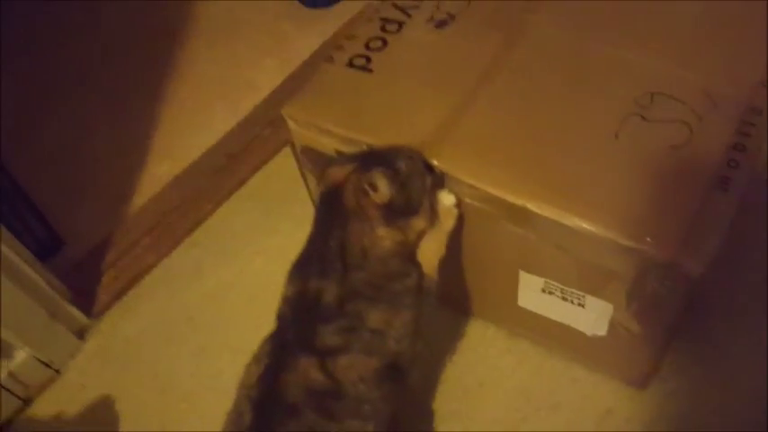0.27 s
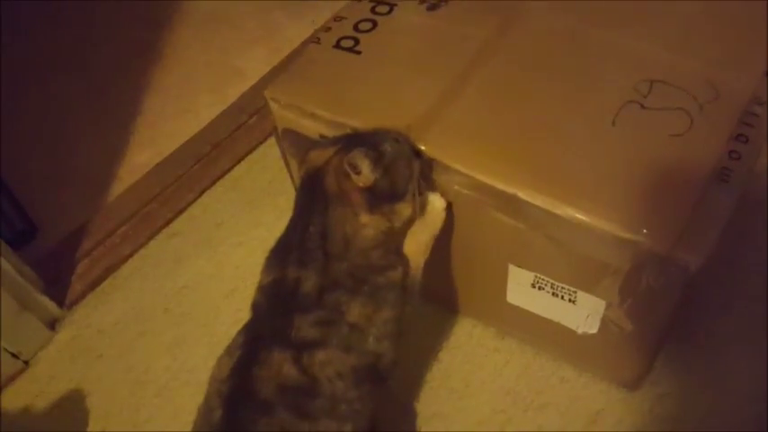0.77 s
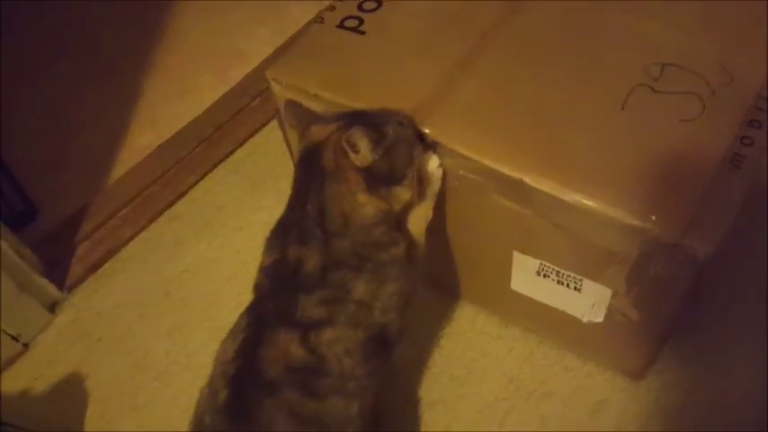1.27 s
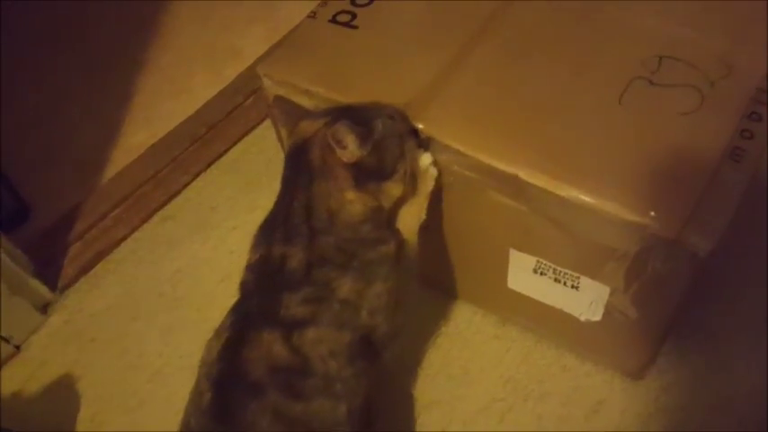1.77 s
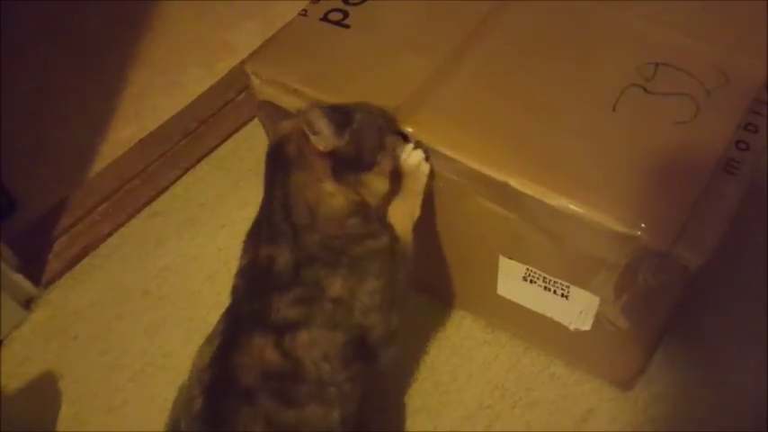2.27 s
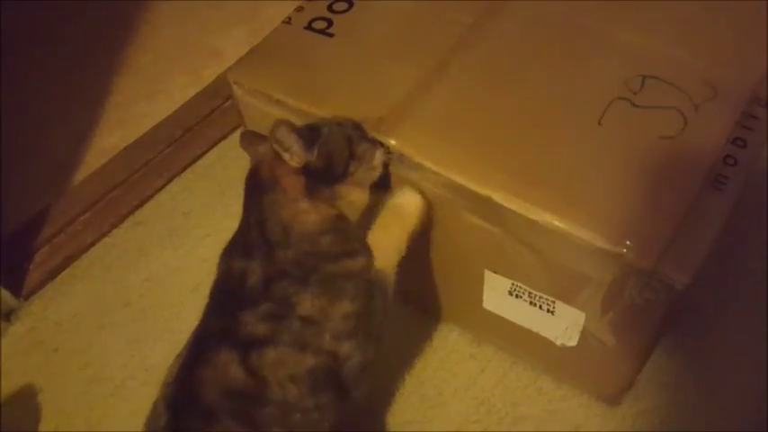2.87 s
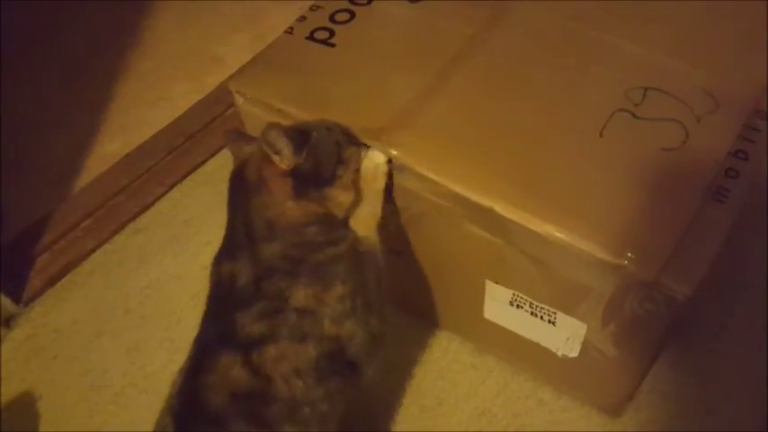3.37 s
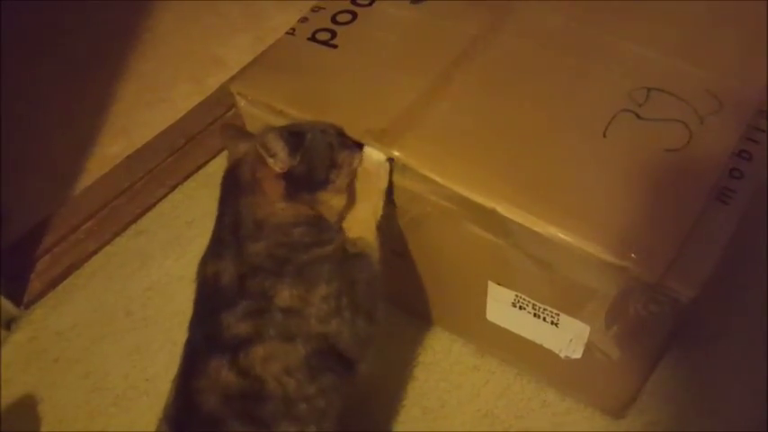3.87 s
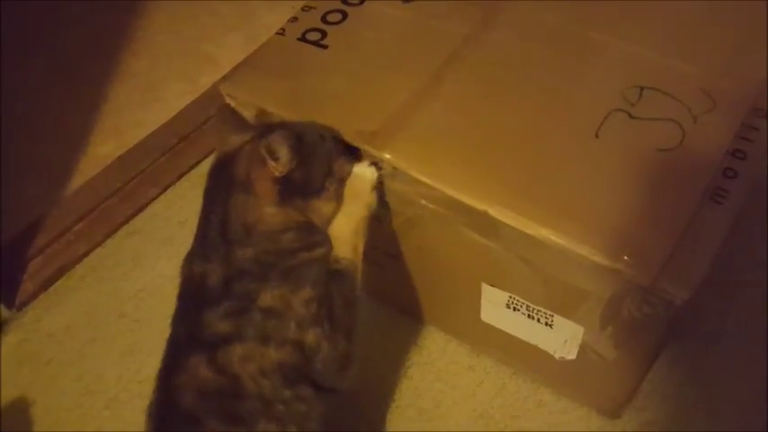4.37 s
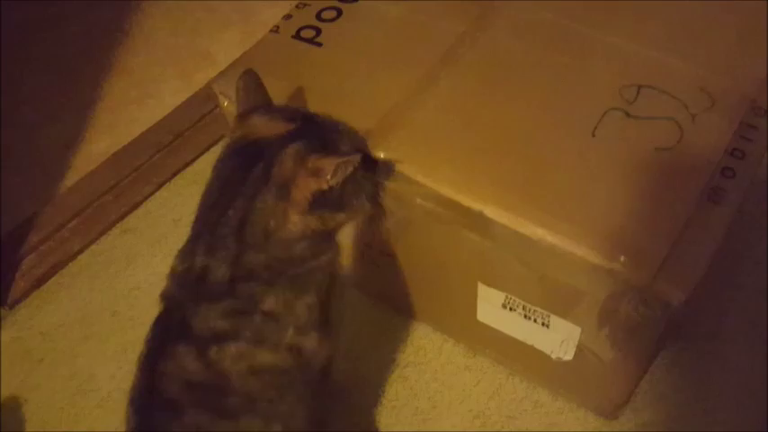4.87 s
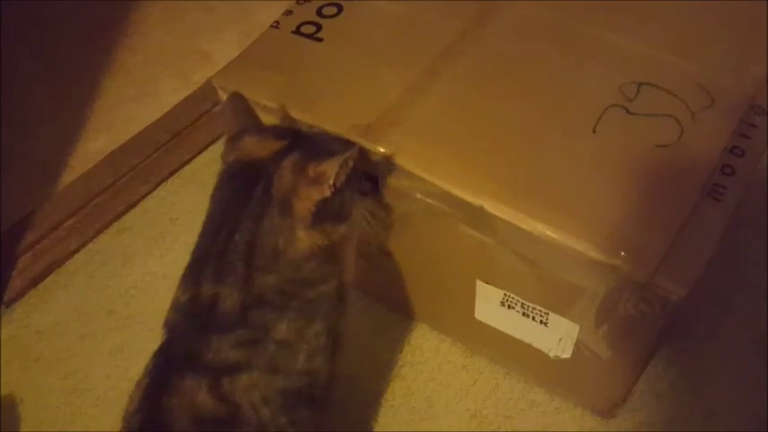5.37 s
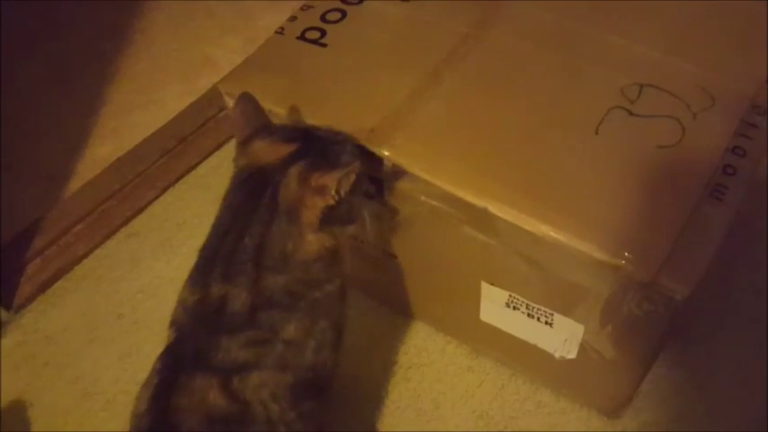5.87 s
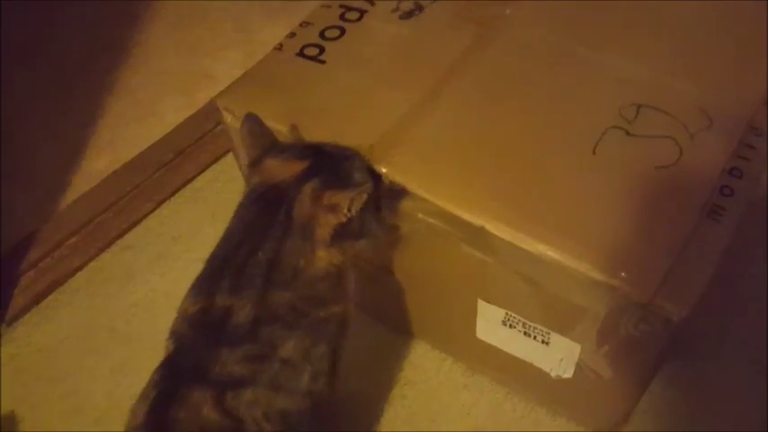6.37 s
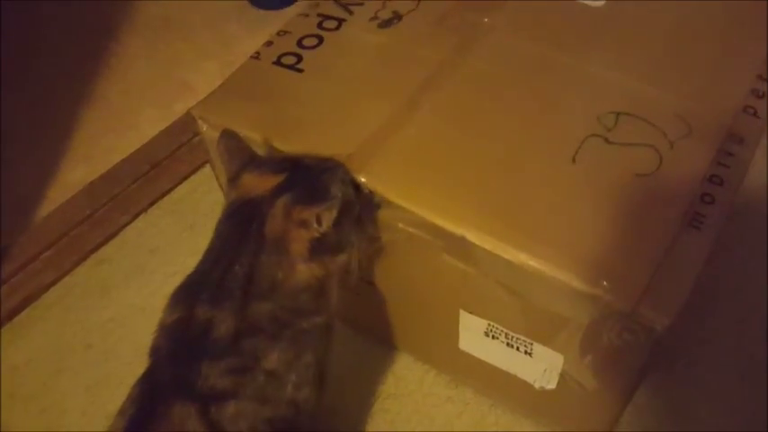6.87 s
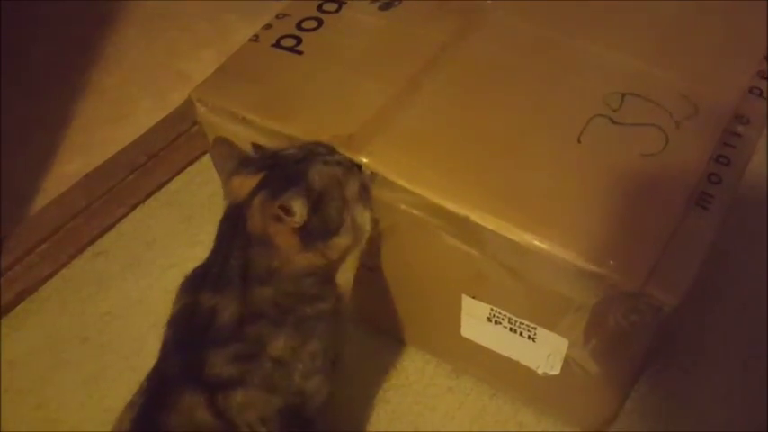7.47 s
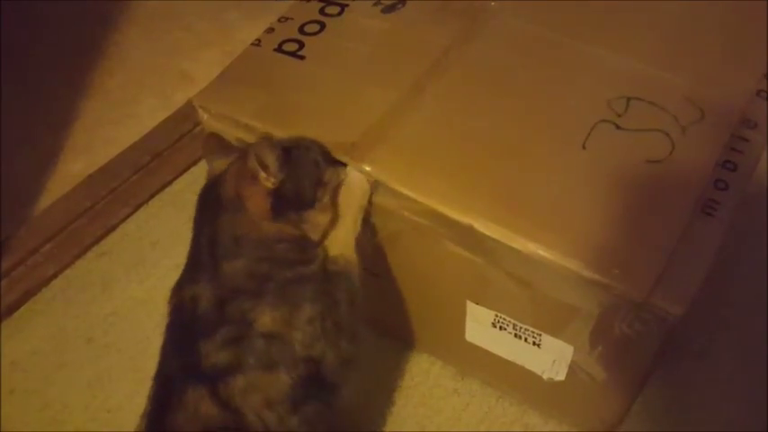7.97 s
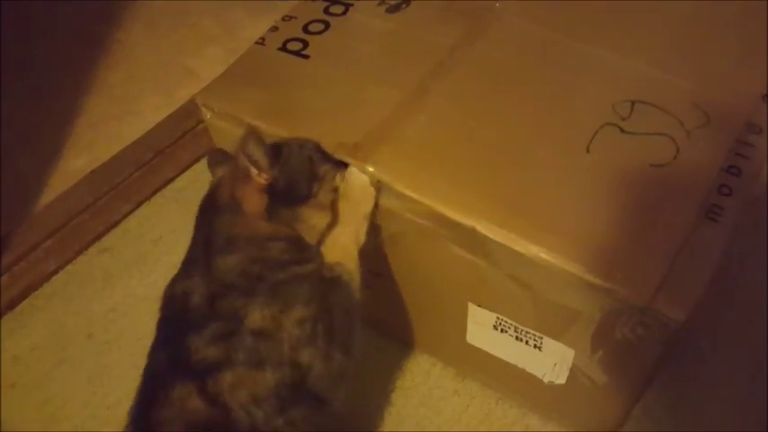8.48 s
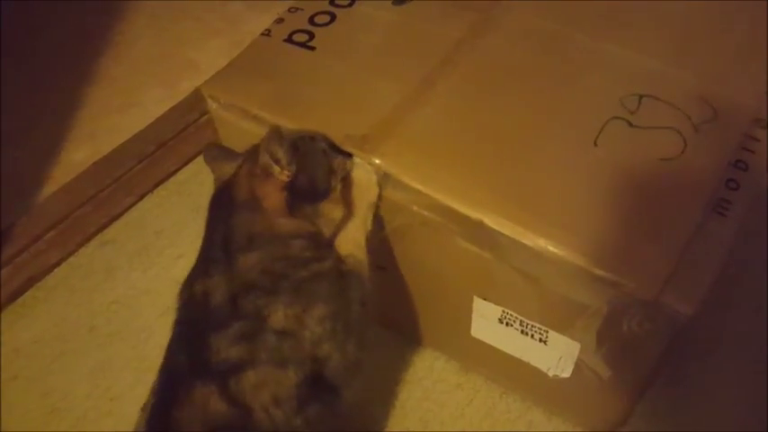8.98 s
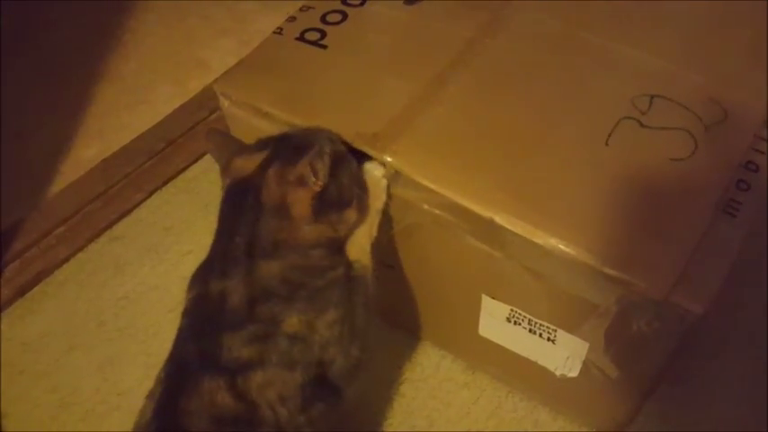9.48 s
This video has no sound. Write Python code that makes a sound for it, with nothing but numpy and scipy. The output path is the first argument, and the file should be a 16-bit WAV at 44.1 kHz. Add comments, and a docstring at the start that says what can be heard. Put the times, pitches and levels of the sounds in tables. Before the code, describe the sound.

Close up in a quiet room, a cat picks at the taped edge of a cardboard box. Sparse pops come first, then a loud sharp crack, a dense run of snaps, gritty scratches and tape ticks, and a louder hollow crack. After a lull, clawing resumes more lightly. A hand-held microphone adds soft handling bumps, low hum and faint hiss.

```python
"""Cat clawing a taped box

A cat claws and bites at the taped edge of a cardboard box in a quiet room, close to a hand-held camera.
Snaps, grit and small bright ticks are shaped noise and impulses; panels and enclosed air resonate.
Paw thuds and fingers nudging the camera are short sine swells; decaying noise makes the room's answer.
Underneath, filtered noise gives a wavering low hum and rumble, microphone noise and a faint hiss,
thickening where the clawing is dense."""
import sys
import numpy as np
from scipy import signal
from scipy.fft import rfft, irfft, next_fast_len
from scipy.io import wavfile
from scipy.ndimage import map_coordinates

SR = 44100
rng = np.random.default_rng(int(sys.argv[2]) if len(sys.argv) > 2 else 0)


def store_pcm(level_fs):
    """Save levels as 16-bit WAV."""
    pcm = np.round(np.clip(level_fs, -1, 1) * 32767).astype(np.int16)
    wavfile.write(sys.argv[1], SR, np.atleast_2d(pcm).T)


N = 429534  # length in samples

# Hum and room rumble, spectral shape: pitch_hz, relative_db (per Hz)
RUMBLE_SPECTRUM = [(18, -30.5), (28, 5), (45, -4), (75, -4.5), (102, 1.5), (140, -6.5), (165, -11.5),
                   (194, -6.5), (257, -12.5), (383, -10.5), (613, -12.5), (640, -14), (900, -24.5),
                   (1170, -49.5), (1980, -120)]
# Rumble, left-right correlation: pitch_hz, likeness (1 = identical)
RUMBLE_LIKENESS = [(60, 0.91), (300, 0.42), (700, 0.11)]
# Rumble fader, before its wavering: time_s, level_db
RUMBLE_FADER = [(0.0, -67), (0.65, -63.5), (5.18, -61.5), (5.6, -64), (8.4, -62), (9.74, -63.5)]
# Faint hiss, spectral shape: pitch_hz, relative_db (per Hz)
HISS_SPECTRUM = [(590, -22.5), (1000, -10.5), (1680, -17), (1930, -28), (2270, -13), (3240, -10.5),
                 (4810, -18.5), (5900, -18.5), (6630, -12.5), (7500, -18.5), (8800, -21.5), (9700, -36),
                 (22000, -120)]
# Hiss fader, before wavering and stereo balance: time_s, level_db
HISS_FADER = [(0, -104), (.2, -70), (.8, -69.5), (2.7, -68.5), (3.4, -70.5), (4.2, -65), (5.8, -84),
              (7.2, -84), (8.7, -71.5), (9.74, -79.5)]
# Microphone noise, spectral shape: pitch_hz, relative_db (per Hz)
MIC_NOISE_SPECTRUM = [(410, -47.5), (700, -6), (1700, -9.5), (2510, -11), (3480, -14), (8900, -21),
                      (15800, -19.5)]

# Room decay: pitch_hz, t60_s (time to fall 60 dB)
ROOM_DECAY = [(100, 0.42), (400, 0.41), (1200, 0.4), (3000, 0.42), (6000, 0.31), (10000, 0.25),
              (16000, 0.22)]
# Echoes, left-right correlation: pitch_hz, likeness (1 = identical)
ECHO_LIKENESS = [(100, 0.9), (350, 0.9), (700, 0.3), (1200, 0.097)]
ECHO_DULL_HZ = 7000  # the sharpest treble beams at the camera; the walls get less
SPARSE_DB, SPARSE_S = 6.5, 0.049  # uneven early arrivals: their scatter, and how soon they merge
# The near wall answers as a dull clump: delay, spread, boost, treble corner
WALL_S, WALL_SPREAD_S, WALL_GAIN, WALL_DULL_HZ = 0.013, 0.0051, 0.94, 2500

# Fingers shifting on the camera by its right port: start_s, level_db, pitch_hz (nominal, before the sag)
BUMPS = [(0.9302, -35.5, 207), (1.026, -42, 200), (1.136, -45, 150), (1.247, -43, 140), (1.5505, -34, 128),
         (1.73, -41, 112), (6.29, -38, 246), (6.357, -40, 149.6), (6.422, -43.5, 224), (6.487, -41.5, 200)]
# Attack; power of the cycle count (under 1: pitch falls); left port against right
BUMP_RISE_CYCLES, BUMP_SAG, BUMP_LEFT_DB = 0.24, 0.68, -33

# Box panels as resonances: pitch_hz, width_hz, relative_db
PANELS = [(291.7, 160, -5), (457.8, 350, -0.5), (730, 830, 0.5), (863, 300, -5), (1043.5, 290, -3.5),
          (1400, 410, -3.5)]
# Air inside the box as resonances: pitch_hz, width_hz, relative_db
CAVITY_MODES = [(108, 100, 3), (161, 8.3, 7.5), (198, 440, 2.5)]
# A paw thudding on the box: start_s, level_db, pitch_hz
KNOCKS = [(0.593, -40.5, 184), (0.773, -52.5, 174), (1.878, -53, 155), (3.046, -49, 300),
          (3.253, -46.5, 150), (3.432, -42.5, 230), (3.657, -45.5, 159.3), (4.958, -25, 232.9),
          (4.96, -34.5, 84.4), (8.237, -41, 148), (8.465, -34, 147.7), (8.467, -32, 353),
          (9.386, -49.5, 149)]
# Swell; contact tick against the thud; send to the walls
KNOCK_RISE_CYCLES, KNOCK_TICK_DB, KNOCK_ECHO_DB = 0.86, -4, -3

# Small bright ticks, the first two are handling, the rest mostly tape unsticking:
# start_s, level_db, pitch_hz
TICKS = [(0.069, -60, 5000), (0.125, -58, 9000), (0.613, -33, 4060), (0.621, -34.5, 4560),
         (1.298, -44, 5750), (1.882, -46, 6000), (1.899, -41, 6500), (1.9496, -45, 7000),
         (1.969, -44, 7460), (2.2318, -45, 7000), (3.611, -50, 4970), (3.761, -40, 4470),
         (4.035, -38.5, 4950), (4.108, -32, 5100), (4.114, -36, 3560), (4.189, -37, 6000),
         (4.197, -37, 4000), (4.328, -42, 5030), (4.506, -41, 2800), (4.793, -51, 5950),
         (4.9092, -47, 3000), (5.2102, -46, 4000), (5.4604, -47.5, 9000), (5.482, -44, 7000),
         (5.825, -43, 9000), (5.958, -49, 6000), (5.9882, -37.5, 11000), (6.905, -50, 8380),
         (7.451, -47.5, 6040), (8.399, -46.5, 2010), (8.607, -30.5, 6460), (8.616, -30, 4000),
         (8.7481, -44.5, 5500), (8.76, -51, 6000)]
# Decay time; sharpness of pitch; share of thin broad crackle; send to the walls
TICK_S, TICK_Q, TICK_PLAIN, TICK_ECHO_DB = 0.0014, 1.8, 0.11, -2.5

# Claws or pads dragging over the card:
# start_s, length_s, scratch_level_db, tape_over_scratch_db, rub_level_db, panel_pitch_hz
SCRAPES = [(0.863, 0.091, -65, -4.5, -91, 690), (1.863, 0.036, -60, 7, -64.5, 600),
           (2.083, 0.19, -68, -18, -79, 614), (3.812, 0.08, -65, -12, -62, 730),
           (3.938, 0.029, -60, 2.5, -63.5, 980), (4.094, 0.073, -57.5, -4, -67, 605),
           (4.175, 0.029, -50.5, -7, -53, 497), (4.578, 0.022, -48, -9, -60, 510),
           (5.181, 0.12, -65.5, -13, -67.5, 830), (5.275, 0.089, -61.5, 6.5, -68.5, 770),
           (5.694, 0.13, -72, -2, -72, 500), (6.176, 0.079, -60.5, 4.5, -64, 500),
           (7.585, 0.046, -60, -8, -66.5, 990), (7.807, 0.26, -76.5, 7.5, -85, 600),
           (8.162, 0.071, -64, -8, -56.5, 385), (8.215, 0.085, -62.5, -1, -62.5, 920),
           (8.335, 0.36, -69, 0.5, -68.5, 396), (8.577, 0.091, -48, -12, -54.5, 870),
           (8.728, 0.065, -63, -20, -66, 920), (8.848, 0.0474, -65.5, -4, -65.5, 1210),
           (9.28, 0.011, -62, -18, -63.5, 600), (9.39, 0.046, -53.5, -4, -58, 860)]
# Scratch on card, spectral shape: pitch_hz, relative_db (per Hz)
SCRATCH_SPECTRUM = [(500, -30.5), (1200, -2.5), (2500, -4), (4000, -8), (7000, -11), (15800, -41.5)]
# Tape fizz, spectral shape: pitch_hz, relative_db (per Hz)
TAPE_SPECTRUM = [(2500, -9.5), (5000, -4), (6500, -0.5), (9000, -2.5), (12500, -3.5), (15800, -9.5)]
CATCHES_PER_S, CATCH_DB = 150, 13  # average rate and boost of single catches in the grit

# A claw or tooth letting go:
# start_s, crack_level_db, box_over_crack_db, tape_over_crack_db, panel_pitch_hz, crack_pitch_hz
SNAPS = [(0.5934, -20.5, 3, 2.5, 757, 2650), (1.457, -26.5, -8, -2, 1400, 2140),
         (1.8782, -39.5, 3, -3, 600, 4520), (2.2845, -28.5, -1, -2.5, 1250, 3020),
         (2.4816, -29, -12.5, -9.5, 467, 2500), (2.733, -39, 2, -12.5, 487, 1585),
         (2.8333, -3.5, -2.5, -9, 600, 5707), (3.113, -40.5, -4.5, -14, 950, 1550),
         (3.2524, -36, 6.5, 1, 426, 1420), (3.285, -31, 1.5, 2.5, 450, 5640),
         (3.4336, -30.5, 5.5, -35, 536, 1670), (3.6559, -26, -1, -15, 715, 2200),
         (3.691, -28.5, -3.5, -12.5, 335, 2390), (3.7887, -25, -28, -8.5, 1170, 4460),
         (3.859, -29, -5, 3, 1040, 4530), (4.0671, -28, -13, -21, 404, 3210),
         (4.0956, -29, -18, -7.5, 945, 3940), (4.103, -25.5, -7, -2.5, 560, 3620),
         (4.1792, -29, -9, -3, 507, 2600), (4.2319, -17, -2, -10, 570, 2020),
         (4.382, -32.5, -14, 2.5, 939, 6260), (4.4785, -27.5, 3, -10, 460, 1080),
         (4.539, -35.5, -26, 0.5, 398, 2170), (4.588, -26.5, 0.5, -3.5, 280, 2970),
         (4.878, -49.5, 16.5, -0.5, 450, 1481), (4.9557, 3, -8, -8.5, 1160, 5770),
         (5.6633, -35.5, -29, 6, 548, 8300), (5.853, -38.5, 1, -25, 1290, 1870),
         (7.5776, -30.5, -16.5, -7, 1105, 1610), (7.637, -34, -12.5, 4.5, 1230, 1495),
         (8.4619, -46, 13, 12, 370, 1400), (8.4715, -35, 10, 10, 760, 1600),
         (8.58, -27.5, -7, -8.5, 1090, 6000), (8.5955, -20, -8.5, -7, 1100, 5330),
         (8.7313, -37.5, 5, -12, 1220, 1470), (8.9901, -43.5, 7.5, -3.5, 386, 2670),
         (9.343, -37, -3.5, -29, 455, 1455), (9.3869, -28, -5, -34, 1050, 1523)]
# Snap crack, spectral shape: pitch_hz, relative_db (per Hz)
CRACK_SPECTRUM = [(400, -17), (1000, -1), (1500, -6), (2200, -4.5), (3200, -3), (5000, -8.5), (6500, -9.5),
                  (9000, -15), (16000, -24.5)]
# A first give, the release, two rebounds: delay_s, level_db
JOLTS = [(0, -8.5), (.0015, 0.5), (.0032, -9.5), (.0049, -8)]
TEAR_S, SLIP_S = 0.00088, 0.0007  # decay of the fibre spray; delay until the claw slips off
ECHO_DB = 4.5  # impulse sent toward the walls
# Air in the box over the panels; small high panels pump less air
THUMP_DB, THUMP_DB_PER_OCTAVE, MID_PANEL_HZ = -4.5, -2, 600
CRACK_LOW = 0.35  # bass cut as a share of crack pitch, before the scaling that lowers it for hard pulls
CRACK_Q, CRACK_RING, CRACK_PLAIN = 8.8, 0.6, 0.86  # sharpness, ringing part, flat part
PANEL_Q, PANEL_RING, PANEL_PLAIN = 11, 1.8, 0.96  # same for the touched panel; hard pulls ring less

# Direct sound, stereo balance: pitch_hz, left_over_right_db
LEFT_OVER_RIGHT = [(300, -1), (1200, 4), (3000, -2), (5500, -12), (10000, 0.5)]
CEILING, TOP_HZ = 0.8, 15850  # camera's soft limit (full scale = 1) and band limit


def amp(db):
    """Turns decibels into gain."""
    return 10 ** (np.asarray(db) / 20)


def unit(x):
    """Scales to rms 1."""
    return x / np.sqrt(np.mean(x ** 2) + 1e-20)


def along(points, hz):
    """Reads (Hz, value) points along a log frequency axis."""
    f, v = np.transpose(points)
    return np.interp(np.log(hz + 1), np.log(f + 1), v)


def fader(points):
    """Draws straight moves between (s, dB) points, one value per sample."""
    s, db = np.transpose(points)
    return np.interp(np.arange(N) / SR, s, db)


def wobble(rate):
    """Draws a smooth random curve with this many knots a second."""
    knots = rng.standard_normal(int(N * rate / SR) + 4)
    return map_coordinates(knots, [np.arange(N) * rate / SR])


def filtered(x, response):
    """Multiplies the spectrum of x by a response of frequency, with room for the tail."""
    m = next_fast_len(N + SR // 2)
    return irfft(rfft(x, m) * response(np.fft.rfftfreq(m, 1 / SR)), m)[..., :N]


def causal(spectrum):
    """Minimum-phase response of unit energy: nothing sounds before the blow."""
    def response(hz):
        cepstrum = irfft(np.log(amp(along(spectrum, hz)) + 1e-6))
        half = len(cepstrum) // 2
        cepstrum[1:half] *= 2
        cepstrum[half + 1:] = 0
        log_response = rfft(cepstrum)
        return unit(np.abs(np.exp(log_response))) * np.exp(1j * log_response.imag)
    return response


def resonant(modes):
    """Sums damped resonances of alternating sign into a response of unit energy."""
    def response(f):
        total = 0
        for k, (center, width, db) in enumerate(modes):
            band = 1j * f * width
            total = total + (-1) ** k * amp(db) * band / (center * center - f * f + band)
        return total / np.sqrt(np.mean(np.abs(total) ** 2))
    return response


def panel(mode):
    """One panel takes up and gives off sound near its pitch, so its resonance acts twice."""
    def response(hz):
        once = resonant([mode])(hz)
        return once ** 2 / np.sqrt(np.mean(np.abs(once) ** 4))
    return response


def panels_db(hz, focus=9):
    """Panels tuned near the touched spot ring the most; focus = dB lost an octave away."""
    return np.array([level - focus * np.log2(center / hz) ** 2 for center, width, level in PANELS])


def pitched(x, hz, q, ring, plain):
    """Blends x with its own ringing at one pitch."""
    return plain * x + ring * signal.lfilter(*signal.iirpeak(hz, q, SR), x)


def alike_pair(z, alike):
    """Mixes two unrelated spectra (on axis -3) into left and right of the given likeness."""
    turn = np.arccos(np.clip(alike, -1, 1)) / 2
    mid, side = z[..., 0, :, :] * np.cos(turn), z[..., 1, :, :] * np.sin(turn)
    return np.stack([mid + side, mid - side], axis=-3)


def rush(spectrum, alike):
    """Filters steady noise into a stereo pair of rms 1 with the given left-right likeness."""
    def shape(hz):
        turn = np.arccos(np.clip(along(alike, hz), -1, 1)) / 2
        return amp(along(spectrum, hz)) * [np.cos(turn), np.sin(turn)]
    mid, side = filtered(rng.standard_normal((2, N)), shape)
    return unit(np.array([mid + side, mid - side]))


def background():
    """Wavering rumble, a faint hiss stronger on the right, and unrelated noise in each microphone."""
    rumble_db = fader(RUMBLE_FADER) + 0.5 * wobble(0.23) + 0.29 * wobble(11.0)
    rumble = amp(rumble_db) * rush(RUMBLE_SPECTRUM, RUMBLE_LIKENESS)
    hiss_db = fader(HISS_FADER) + 0.74 * wobble(1) + [[-2.1], [2.1]]
    hiss = amp(hiss_db) * rush(HISS_SPECTRUM, [(1000, 0.23)])
    mic_noise = amp(-69.0) * rush(MIC_NOISE_SPECTRUM, [(1000, 0)])
    return rumble + hiss + mic_noise


def room(x, count=4):
    """Each pitch dies at its own speed; random tails take turns by the clock, 1/8 s of sound each."""
    hz, t, z = signal.stft(rng.standard_normal((count, 2, SR * 3 // 4)), SR, nperseg=256)
    decay = amp(-60 * t / along(ROOM_DECAY, hz)[:, None])
    z = alike_pair(z, along(ECHO_LIKENESS, hz)[:, None]) * decay
    dulling = 1 + (hz[:, None] / WALL_DULL_HZ) ** 2
    z = z * (1 + WALL_GAIN / dulling * np.exp(-((t - WALL_S) / WALL_SPREAD_S) ** 2))
    tails = signal.istft(z, SR, nperseg=256)[1]
    age = np.arange(tails.shape[-1]) / SR
    tails *= amp(SPARSE_DB * np.exp(-age / SPARSE_S) * rng.standard_normal(tails.shape))
    tails *= 1 - np.exp(-age / 0.0051)  # the first walls take a few ms
    turn = np.arange(N) * 8 // SR % count
    echoes = np.zeros((2, N))
    for k, tail in enumerate(tails):
        tail = tail / np.linalg.norm(tail[0])
        echoes += signal.fftconvolve((x * (turn == k))[None], tail, axes=1)[:, :N]
    return echoes


def bumps():
    """A dry dent through the camera housing: quick start, sagging pitch, gone in about two cycles."""
    out, t = np.zeros(N + SR), np.arange(SR // 20) / SR
    for start_s, db, hz in BUMPS:
        u = t * hz / BUMP_RISE_CYCLES
        dent = np.sin(2 * np.pi * (hz * t) ** BUMP_SAG) * u * np.exp(1 - u)
        out[round(start_s * SR):][:len(t)] -= amp(db) * dent
    return out[:N] * amp([[BUMP_LEFT_DB], [0]])


def knocks():
    """A soft low push swells for most of a cycle and soon dies, with a faint panel tick at its height."""
    out, contacts, t = np.zeros(N + SR), np.zeros(N), np.arange(SR // 5) / SR
    for start_s, db, hz in KNOCKS:
        u = t * hz / KNOCK_RISE_CYCLES
        push = np.sin(2 * np.pi * hz * t) * (u * np.exp(1 - u)) ** 3
        out[round(start_s * SR):][:len(t)] += amp(db) * push
        contacts[round((start_s + KNOCK_RISE_CYCLES / hz) * SR)] = amp(db + KNOCK_TICK_DB)
    return out[:N] + filtered(contacts, resonant(PANELS))


def ticks():
    """Each tick is a short burst of decaying noise around its own pitch; scene() adds some echo."""
    out, t = np.zeros(N + SR), np.arange(SR // 50) / SR
    for start_s, db, hz in TICKS:
        spray = rng.standard_normal(len(t)) * np.exp(-t / TICK_S)
        burst = pitched(spray, hz, TICK_Q, 1, 0) + TICK_PLAIN * np.diff(spray, prepend=0)
        out[round(start_s * SR):][:len(t)] += amp(db) * burst / np.abs(burst).max()
    return out[:N]


def scrapes():
    """Clumped grit under strokes that swell and stop drives scratch, tape fizz and dull panel rub."""
    paths = [causal(SCRATCH_SPECTRUM), causal(TAPE_SPECTRUM)] + [panel(mode) for mode in PANELS]
    level = np.zeros((len(paths), N))
    for start_s, length_s, db, tape_db, rub_db, hz in SCRAPES:
        stroke = np.sin(np.pi * np.linspace(0, 1, round(length_s * SR))).clip(0) ** 0.5
        gains = amp([db, db + tape_db, *(rub_db + panels_db(hz))])
        level[:, round(start_s * SR):][:, :len(stroke)] += gains[:, None] * stroke
    catches = rng.random(N) < CATCHES_PER_S / SR
    scratch_or_tape = (np.arange(len(paths)) < 2)[:, None]  # the rub has no catches
    catches_db = CATCH_DB * catches * scratch_or_tape
    uneven_db = 6.6 * rng.standard_normal(level.shape) + 4.3 * wobble(120) + catches_db
    grit = rng.standard_normal(level.shape) * amp(uneven_db)
    return sum(filtered(stroke * unit(x), path) for stroke, x, path in zip(level, grit, paths))


def snaps():
    """A jolt amid a spray of breaking fibres shakes card and tape; the jolt drives panels and inner air."""
    paths = [causal(CRACK_SPECTRUM), causal(TAPE_SPECTRUM), resonant(CAVITY_MODES)]
    paths += [panel(mode) for mode in PANELS]
    # Axes: toward camera or walls, path, time
    force, t = np.zeros((2, len(paths), N + SR)), np.arange(SR // 8) / SR
    spray_envelope = (t + 0.00033) * np.exp(-t / TEAR_S)
    to_walls = amp(ECHO_DB) * (t == 0)
    release = np.roll(t == 0, round(JOLTS[1][0] * SR))
    push = np.array([release, to_walls])  # toward the camera, the box jolts once, at the release
    for start_s, db, box_db, tape_db, hz, crack_hz in SNAPS:
        focus = np.clip(-1.3 * db, 2, 28)  # the hardest pulls shake the whole box
        local = np.tanh(focus / 8)
        body_db = box_db + panels_db(hz, focus)
        thump_db = box_db + THUMP_DB + THUMP_DB_PER_OCTAVE * np.log2(hz / MID_PANEL_HZ)
        gains = amp(db + np.array([0, tape_db, thump_db, *body_db]))

        uneven = amp(3.4 * rng.standard_normal(len(t)))
        fibres = rng.standard_normal(len(t)) * uneven * spray_envelope
        fibres = 1.4 * fibres / np.linalg.norm(fibres)
        fibres[round(SLIP_S * SR)] += 1.3
        tear = np.array([fibres, to_walls])
        thin = signal.lfilter(*signal.butter(2, CRACK_LOW * local * crack_hz, 'high', fs=SR), tear)
        crack = pitched(thin, crack_hz, CRACK_Q, CRACK_RING, CRACK_PLAIN)
        touched = pitched(push, hz, PANEL_Q, PANEL_RING * local, PANEL_PLAIN)

        blow = force[:, :, round(start_s * SR):][..., :len(t)]
        blow[:, 0] += gains[0] * crack
        blow[:, 1] += gains[1] * tear
        blow[:, 2] += gains[2] * push
        blow[:, 3:] += gains[3:, None] * touched[:, None]
    crack, tape, cavity, *panels = [filtered(force[:, k, :N], path) for k, path in enumerate(paths)]
    return crack, tape, cavity + sum(panels)


def jolts(hz):
    """Repeats a tear as a first give, the release and two rebounds."""
    return sum(amp(db) * np.exp(-2j * np.pi * hz * delay_s) for delay_s, db in JOLTS)


def scene():
    """Box sound reaches the right port slightly first; clawed face and body reach the walls separately."""
    crack, tape, body = snaps()
    rubbing, thuds, crackle = scrapes(), knocks(), ticks()
    tearing = amp(-2.0) * filtered(crack[0] + tape[0], jolts)
    near = tearing + amp(2.5) * body[0] + rubbing + thuds + crackle

    lag_s, side = np.array([[2.4e-5], [0]]), np.array([[0.5], [-0.5]])  # left, right

    def stereo(hz):
        return np.exp(-2j * np.pi * hz * lag_s) * amp(side * along(LEFT_OVER_RIGHT, hz))

    direct = filtered(near, stereo)
    face = crack[1] + amp(0.5) * rubbing + amp(2.0) * tape[1] + amp(TICK_ECHO_DB) * crackle
    box = amp(-3.5) * body[1] + amp(KNOCK_ECHO_DB) * thuds
    echoes = filtered(room(face) + room(box), lambda hz: 1 / (1 + 1j * hz / ECHO_DULL_HZ))
    return direct + amp([[2], [3.4]]) * echoes + bumps() + background()


def record(dry):
    """The camera rounds off high peaks, thins the deepest bass and cuts all above its band limit."""
    rounded = dry / (1 + np.abs(dry / CEILING) ** 4) ** 0.25
    return filtered(rounded, lambda hz: (1j * hz / (55 + 1j * hz)) ** 2 * (hz < TOP_HZ))


dry = scene()
out = record(dry)
store_pcm(out)
```